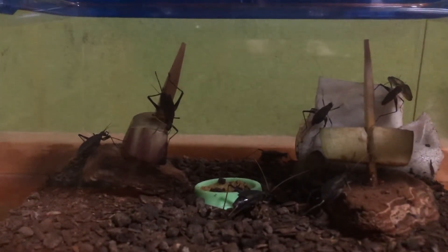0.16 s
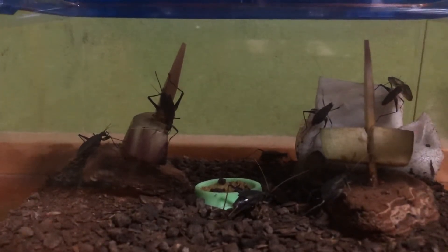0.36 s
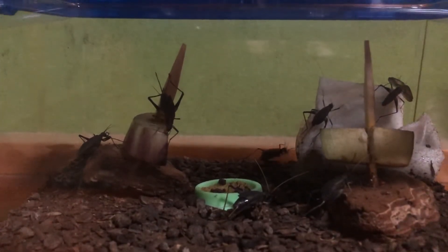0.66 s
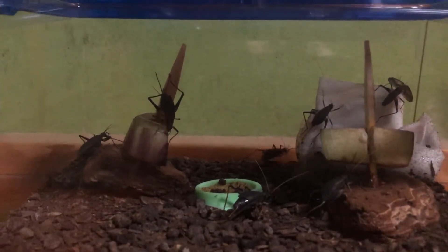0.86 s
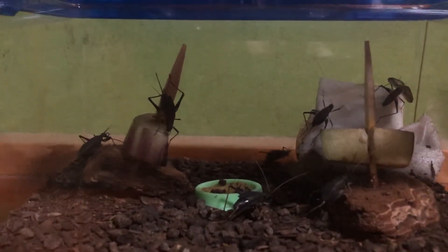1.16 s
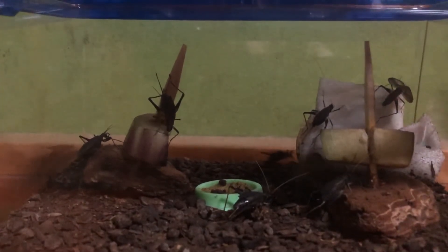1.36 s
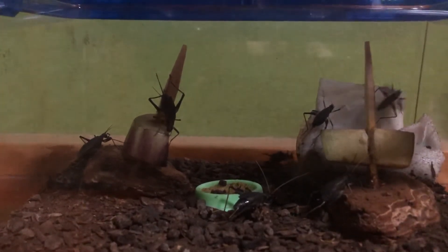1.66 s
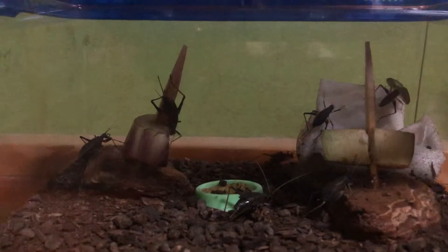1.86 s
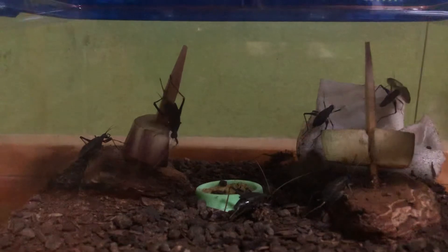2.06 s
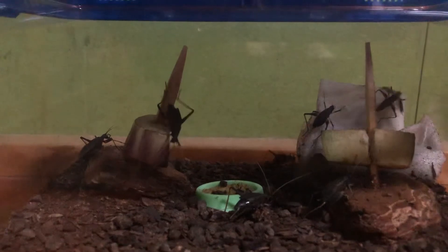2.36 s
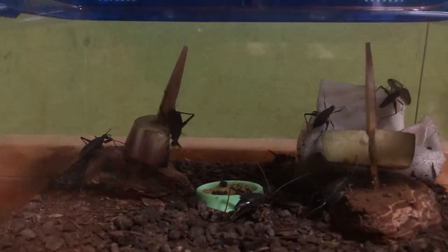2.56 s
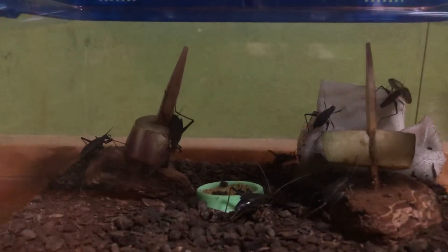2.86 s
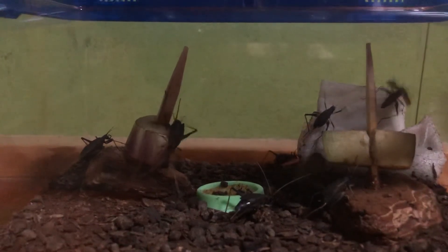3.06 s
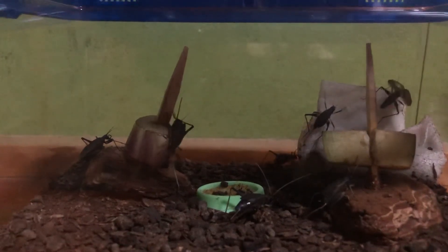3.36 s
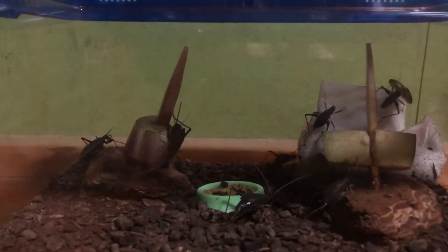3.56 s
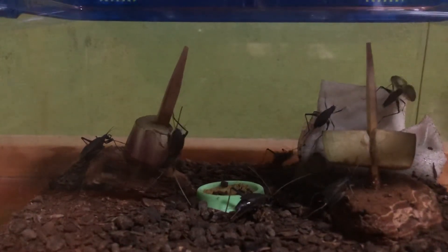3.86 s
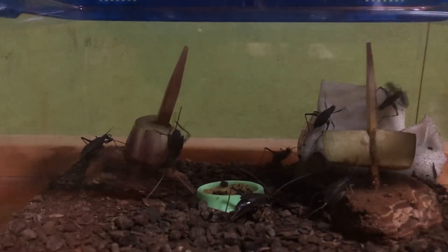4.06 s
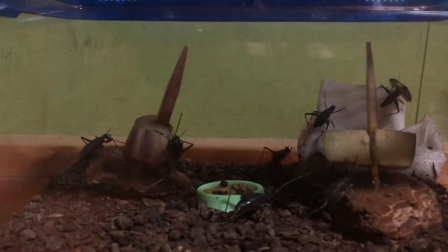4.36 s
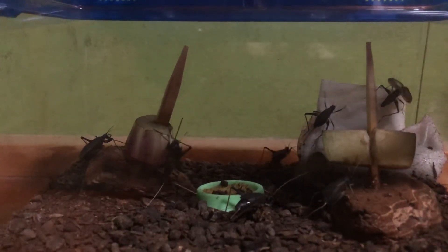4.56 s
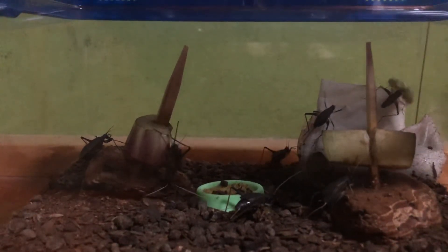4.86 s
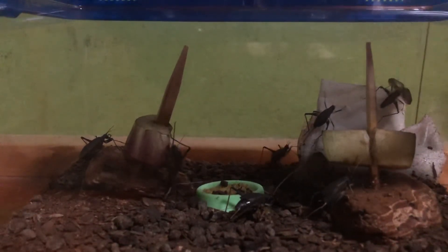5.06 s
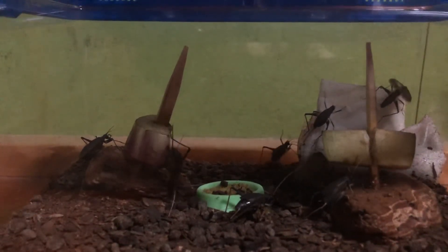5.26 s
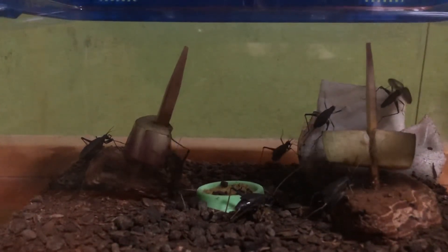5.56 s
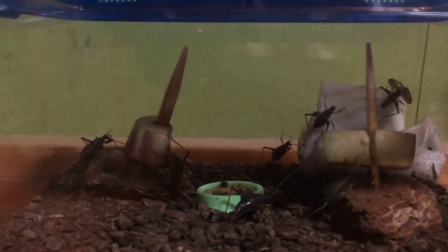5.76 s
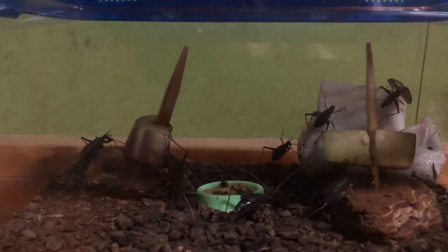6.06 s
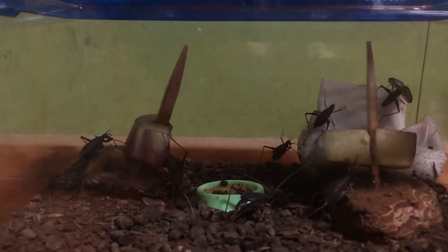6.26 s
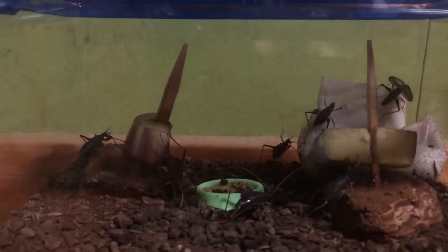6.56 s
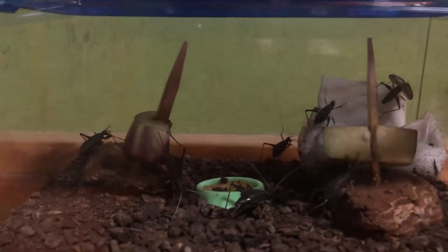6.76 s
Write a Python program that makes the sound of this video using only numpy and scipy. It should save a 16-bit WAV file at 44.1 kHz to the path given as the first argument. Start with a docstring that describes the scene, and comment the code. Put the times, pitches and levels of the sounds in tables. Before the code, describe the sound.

A quiet room rumbles, hums and hisses faintly throughout. A faint high rustle comes at about 0.2 seconds, then soft wing flicks from 0.6 to 0.8. Just before one second, three crickets in a plastic tank start singing, all high and rapidly pulsing. One rings in seven trilling swells, stronger from 1.8 seconds, each starting bright, then slowing and sinking slightly. Another scratches softly, a little lower, growing louder around 2.6. The third cuts in with short, slightly higher chirps, the loudest sounds, at about 0.9, 1.9, 2.9 and 3.6 seconds. Lone hard wing strokes ring out between 2.6 and 5.1, with a few small sharp ticks from 3.6 onward. The swelling trill ends near 5.9 seconds and the scratchy one fades out by 6.4, leaving only the room. The tank walls and a short room echo lightly blur the song.

```python
"""Three bell crickets sing in a plastic tank, in a quiet room that rumbles, hums and hisses throughout.
First come a faint rustle, a tick and soft wing flicks. Just before one second the song starts: one cricket
scratches softly, one cuts in with short high chirps, and one trills in swells. Later, lone hard strokes
ring out; the scratchy cricket stops last. Each wing stroke drags a scraper over a file of tiny teeth:
the wing rings near 4.7 kHz with overtones, the teeth rasp, and walls and room blur the strokes."""
import sys
import numpy as np
from scipy import signal
from scipy.fft import rfft, irfft, next_fast_len
from scipy.io import wavfile

SR = 44100
rng = np.random.default_rng(int(sys.argv[2]) if len(sys.argv) > 2 else 0)


def digitize_waveform(pressure):
    """Quantize a signal to 16-bit integers and store it at the path in sys.argv[1].

    Rows of a 2-D input are taken as channels; values are limited to [-1, 1].
    """
    field = np.atleast_2d(pressure).T
    bounded = np.clip(field, -1, 1)
    quanta = np.round(bounded * 32767).astype(np.int16)
    wavfile.write(sys.argv[1], SR, quanta)


N = 304290
TIME = np.arange(N) / SR
# rasp of the wing teeth in both trills: (frequency [Hz], relative level [dB])
TRILL_RASP = [(2900, -22), (3400, -16.5), (3900, -37), (4150, 8), (4350, -6), (4800, 7), (5250, -0.5),
              (5950, 1), (6500, -8.5), (8300, -10.5), (9800, -5), (10500, -17), (11500, -9.5), (13300, -14),
              (15800, -6.5)]


def from_db(db):
    """Turn decibels into a gain to multiply by."""
    return 10 ** (np.asarray(db) / 20)


def rms_one(x):
    """Scale a signal to an average power of one."""
    return x / np.sqrt(np.mean(x ** 2) + 1e-20)


def coloured(x, spectrum):
    """Filter by (frequency [Hz], level [dB]) points; white noise keeps its power."""
    hz, db = np.transpose(spectrum)
    size = next_fast_len(N + 4096)
    bin_hz = np.maximum(np.arange(size // 2 + 1) * SR / size, 1)
    gain = from_db(np.interp(np.log(bin_hz), np.log(hz), db, left=-120, right=-120))
    return irfft(rfft(x, size) * rms_one(gain), size)[:N]


def noise(spectrum):
    """Steady noise with the given tone colour and a power of one."""
    return rms_one(coloured(rng.standard_normal(N), spectrum))


def phrase(start, end, db, sag_db_per_s, attack_s, hold_s, release_s):
    """Gain of one phrase: it rises, holds, sags as the wings tire (a negative sag grows), then fades."""
    age = np.maximum(TIME - start, 0)
    rise = 1 - np.exp(-age / attack_s)
    fall = np.exp(-np.maximum(TIME - end, 0) / release_s)
    return rise * fall * from_db(db - sag_db_per_s * np.maximum(age - hold_s, 0))


def latest_phrase(phrases):
    """At every moment, the columns of the phrase that began last."""
    rows = np.array(phrases)
    return rows[np.maximum(np.searchsorted(rows[:, 0], TIME) - 1, 0)].T


def room_background(rumble_db=-66, hiss_db=-71):
    """Ventilation rumbles under a mains hum and a fine hiss."""
    # the room's low and high noise: (frequency [Hz], relative level [dB])
    rumble = [(15, -52), (25, -14.5), (55, -5), (92, -6.5), (124, 0), (193, -7.5), (277, -6), (397, -10.5),
              (485, -7), (592, -12.5), (2010, -18.5), (2410, -24), (3000, -32), (3900, -50), (6600, -120)]
    hiss = [(1760, -20.5), (3000, -1.5), (3260, -10), (3590, -0.5), (3800, -8), (4880, -9), (5420, 2),
            (5970, -11), (7350, -9.5), (9320, -15), (10600, -14.5), (11300, -15.5), (13000, -17.5),
            (14900, -3), (15800, -5.5)]
    # steady tones of the hum: (frequency [Hz], level [dB])
    hum_tones = [(71, -77.5), (120, -76), (273, -84.5)]
    hum = sum(from_db(db) * np.sqrt(2) * np.sin(2 * np.pi * (hz * TIME + rng.random()))
              for hz, db in hum_tones)
    return from_db(rumble_db) * noise(rumble) + from_db(hiss_db) * noise(hiss) + hum


def rustle():
    """A faint, high rustle comes and goes before the song."""
    gain = phrase(start=0.18, end=0.34, db=-68.5, sag_db_per_s=-2, attack_s=.08, hold_s=0, release_s=0.11)
    return gain * noise([(3400, -18), (4300, 5), (4900, -5), (8000, -21)])


def ticks(fade_s=0.027, level_db=-10):
    """Wings and feet tick sharply: each tick is a burst of noise that drops 60 dB in fade_s."""
    # the ticks: (time [s], relative level [dB])
    hits = [(0.3166, -50), (3.64, -40), (3.7938, -39), (4.2339, -29), (5.1233, -25.5), (5.2134, -35.5),
            (6.0617, -44.5)]
    # their tone colour: (frequency [Hz], relative level [dB])
    colour = [(3000, 10), (4500, 14.5), (5800, 11.5), (7300, 20), (9000, 1.5), (11400, 13), (13500, 6),
              (15800, -1.5)]
    bursts = sum(from_db(db - 60 * np.clip(TIME - s, 0, 1) / fade_s) * (TIME >= s) for s, db in hits)
    return from_db(level_db) * coloured(bursts * rng.standard_normal(N), colour)


def single_strokes(pitch_hz=4810, flicks_per_s=56.3, flick_db=-37.5, uneven_db=2.9, hard_db=-9):
    """A soft wing flick is brief and scratchy; a hard stroke is a longer, purer burst of the wing's tone."""
    # runs of soft flicks before the song: (start [s], end [s])
    flick_runs = [(0.566, 0.674), (0.7657, 0.838)]
    # lone hard strokes during the song: (time [s], relative level [dB])
    hard_strokes = [(2.6136, -10.5), (2.9218, -5), (2.9867, -21), (3.7124, -6.5), (4.2263, -5.5),
                    (5.1123, -7.5)]
    # rasp of the teeth in both: (frequency [Hz], relative level [dB])
    rasp = [(3800, -36), (4150, 8), (4900, 2.5), (5500, 2.5), (6600, -9), (8500, -9.5), (9800, -14.5),
            (13000, -15.5), (14300, -16), (15500, -1)]
    scrape = noise(rasp)

    def stroke(start, db, length_s, edge_db):
        """One push of the wing: a tone, with its octave and some rasp as a rough edge."""
        phase = 2 * np.pi * pitch_hz * (1 + 0.0086 * rng.standard_normal()) * (TIME - start)
        pressure = np.sin(np.pi * np.clip((TIME - start) / length_s, 0, 1))
        edge = from_db(-14) * np.sin(2 * phase) + from_db(-13) * scrape
        return from_db(db) * pressure * (np.sin(phase) + from_db(edge_db) * edge)

    flicks = [(start + k / flicks_per_s, flick_db + uneven_db * rng.standard_normal())
              for start, end in flick_runs for k in range(round((end - start) * flicks_per_s))]
    soft = sum(stroke(start, db, length_s=0.0047, edge_db=0) for start, db in flicks)
    hard = sum(stroke(start, db + hard_db, length_s=0.0097, edge_db=-18) for start, db in hard_strokes)
    return soft + hard


def wing_song(gain, strokes_per_s, start, pitch_hz, glide, closing_share, harmonics_db,
              rasp, rasp_db, opening_db, uneven_db, grit_db, ease_db=0):
    """Closing wings sound a short falling tone and a rasp of teeth; opening wings scrape more weakly."""
    wander = np.interp(TIME, np.linspace(0, TIME[-1], num=40), rng.standard_normal(40))
    cycles = np.cumsum(strokes_per_s + .5 * wander) / SR
    position = (cycles - np.interp(start, TIME, cycles)) % 1  # 0 to 1 over one closing and opening
    stroke_number = np.cumsum(np.diff(position, prepend=0) < 0)
    force, detune, phase_offset = rng.standard_normal((1024, 3))[stroke_number].T
    closing = position < closing_share
    travel = np.where(closing, position / closing_share, (position - closing_share) / (1 - closing_share))
    # the scraper grips quickly and holds its pressure along the file
    pressure = np.tanh(2 * np.sin(np.pi * travel)) * np.where(closing, 1, from_db(opening_db))
    # it slows on the way, so each stroke falls in pitch
    hz = pitch_hz * (1 + glide * (.5 - travel) + 0.0064 * detune)
    phase = 2 * np.pi * (np.cumsum(hz) / SR + phase_offset)
    # overtones grow faster than the pressure
    tone = sum(from_db(db) * rms_one(pressure ** (.5 + .5 * k) * np.sin(k * phase))
               for k, db in enumerate(harmonics_db, 1))
    # uneven teeth: some 28-sample patches catch harder; the scrape fades by ease_db along the file
    catch = np.minimum(rng.exponential(1, N), 3)[np.arange(N) // 28]
    teeth = rng.standard_normal(N) * from_db(grit_db * catch - ease_db * travel)
    scrape = rms_one(coloured(teeth * pressure, rasp))
    return gain * from_db(uneven_db * force) * (tone + from_db(rasp_db) * scrape)


def scratchy_cricket():
    """A lower, softer trill from wings that scrape in both directions."""
    # spells of scratching: (start [s], end [s], relative level [dB], sag [dB/s])
    spells = [(0.82, 2.62, -56.5, -2.5), (2.584, 3.366, -50, 0.5), (3.371, 5.113, -48, 2.5),
              (5.13, 6.366, -48.5, 7)]
    gain = sum(phrase(*spell, attack_s=0.026, hold_s=0.31, release_s=.018) for spell in spells)
    return wing_song(gain, strokes_per_s=52.7, start=spells[0][0], pitch_hz=4645, glide=0.042,
                     closing_share=.5, harmonics_db=[15.3, -4.5, -19], rasp=TRILL_RASP, rasp_db=0.54,
                     opening_db=-7, uneven_db=1.3, grit_db=4.5)


def chirping_cricket():
    """Loud, higher chirps that bite at the start of each stroke; harder singing rings purer."""
    # the chirps: (start [s], end [s], relative level [dB], sag [dB/s], wing strokes [1/s])
    chirps = [(0.8712, 1.016, -31, 0, 55.4), (1.851, 2.05, -29, 10, 57.4), (2.8875, 3.12, -28.5, 17, 53),
              (3.634, 4.04, -27, 23, 48.8)]
    # rasp of this cricket's teeth: (frequency [Hz], relative level [dB])
    rasp = [(3000, -48), (4000, -35), (4400, -8.5), (4900, 2.5), (5250, -13), (5750, 8.5), (6600, -1.5),
            (8300, -13), (9900, 2), (10700, -12), (11700, -9.5), (13300, -23), (14600, -3.5), (15300, 4),
            (15800, -3)]
    gain = sum(phrase(*chirp[:4], attack_s=0.018, hold_s=0.19, release_s=0.083) for chirp in chirps)
    effort = gain / gain.max()
    start, *_, strokes_per_s = latest_phrase(chirps)
    return wing_song(gain, strokes_per_s, start, pitch_hz=4810, glide=0.0075, closing_share=.5,
                     harmonics_db=[1.5, -22.5, -31], rasp=rasp, rasp_db=-14.5 - 5.3 * effort,
                     opening_db=-20, uneven_db=0.2, grit_db=3.5, ease_db=26)


def swelling_cricket(lift_hz=48, settle_s=.22, bright_db=7, mellow_s=0.4, slowing_per_s2=5.5):
    """Each swell of this trill starts fast, high and bright, then slows, sinks in pitch and mellows."""
    # the swells: (start [s], end [s], relative level [dB], sag [dB/s], rise time [s])
    swells = [(0.894, 1.1, -51.5, -12, 0.01), (1.139, 1.64, -55, -2.5, 0.086),
              (1.785, 2.55, -46, 16.5, 0.057), (2.592, 3.303, -44, 14.5, 0.0038),
              (3.33, 4.15, -44, 10.5, 0.0086), (4.176, 5.07, -43, 11.5, 0.0078),
              (5.082, 5.92, -43, 8.5, 0.016)]
    start = latest_phrase(swells)[0]
    age = np.abs(TIME - start)
    strokes_per_s = 57 - slowing_per_s2 * age
    pitch_hz = 4732 + lift_hz * np.exp(-age / settle_s)
    gain = sum(phrase(*swell, hold_s=0.11, release_s=0.046) for swell in swells)
    # the third harmonic shines at the start and when the wings press hard
    third_db = -19.0 + bright_db * np.exp(-age / mellow_s) + 7 * gain / gain.max()
    return wing_song(gain, strokes_per_s, start, pitch_hz, glide=0.016, closing_share=.53,
                     harmonics_db=[14.3, 2.3, third_db], rasp=TRILL_RASP, rasp_db=-9,
                     opening_db=-11.5, uneven_db=-0.12, grit_db=3.5)


def reflections(x, scatter_db=-8, scatter_fade_s=0.088, room_db=-3.5, room_fade_s=0.39):
    """One set of echo paths: wall bounces and quick scatter in the tank, then the room's longer tail."""
    # echoes from the tank walls: (delay [s], relative level [dB])
    walls = [(.0045, -6.5), (.0098, -11)]
    t = TIME[:SR // 2]
    scatter, tail = rng.standard_normal((2, len(t))) * (t > .002)
    response = from_db(scatter_db) * rms_one(scatter * from_db(-60 * t / scatter_fade_s))
    response += from_db(room_db) * rms_one(tail * from_db(-60 * t / room_fade_s))
    response /= np.sqrt(len(t))
    for delay, db in walls:
        response[round(delay * rng.uniform(.9, 1.1) * SR)] += from_db(db)
    return signal.oaconvolve(x, response)[:N]


def tank_and_room(x, echo_db, turns_per_s=0.6005, treble_db=-6.5):
    """Shifting wings send the sound along changing paths; overtones echo less than the main tone."""
    angle = 2 * np.pi * (turns_per_s * TIME + rng.random())
    echoes = reflections(x * np.cos(angle)) + reflections(x * np.sin(angle))
    dull = signal.sosfiltfilt(signal.butter(4, 7500, fs=SR, output="sos"), echoes)
    return x + from_db(echo_db) * (dull + from_db(treble_db) * (echoes - dull))


def scene(song_db=-2):
    """The crickets share the tank, the chirping one most in the open; the room murmurs behind them."""
    song = (tank_and_room(swelling_cricket(), echo_db=0.5)
            + tank_and_room(chirping_cricket(), echo_db=-1.0)
            + tank_and_room(scratchy_cricket(), echo_db=1.07)
            + tank_and_room(single_strokes() + ticks(), echo_db=-1.0))
    # such small wings give off almost nothing below their ringing pitch
    song = signal.sosfilt(signal.butter(6, 3400, "high", fs=SR, output="sos"), song)
    return (from_db(song_db) * song + rustle() + room_background())[None]


def record(dry, bass_cut_hz=47, treble_cut_hz=15750):
    """The microphone thins the deep bass; the highest treble is cut steeply."""
    thinned = signal.sosfilt(signal.butter(6, bass_cut_hz, "high", fs=SR, output="sos"), dry)
    return signal.sosfilt(signal.ellip(12, .1, 80, treble_cut_hz, fs=SR, output="sos"), thinned)


dry = scene()
out = record(dry)
digitize_waveform(out)
```